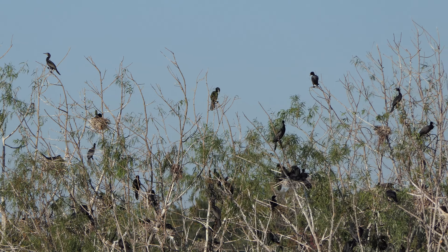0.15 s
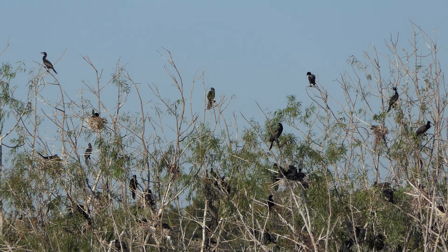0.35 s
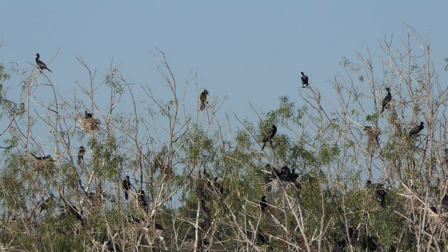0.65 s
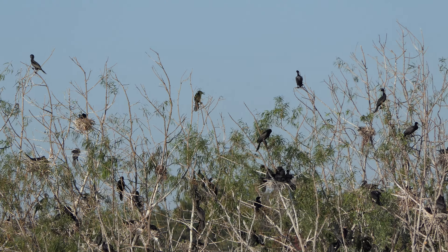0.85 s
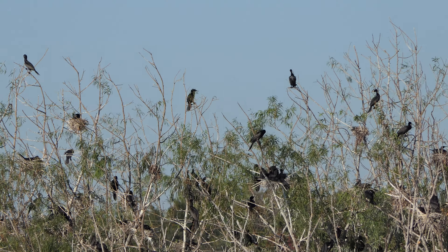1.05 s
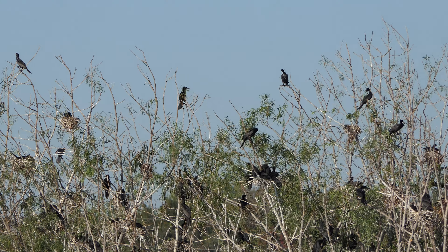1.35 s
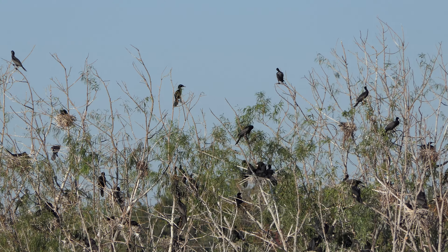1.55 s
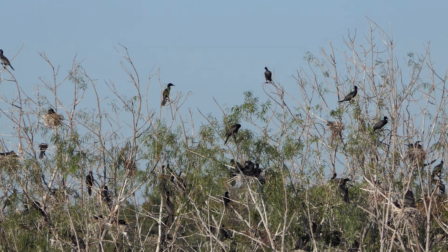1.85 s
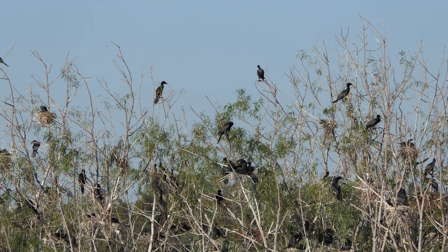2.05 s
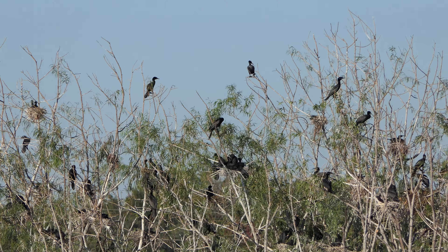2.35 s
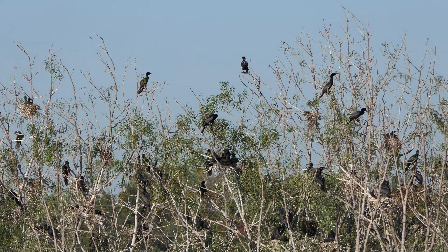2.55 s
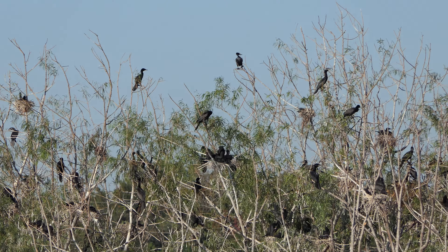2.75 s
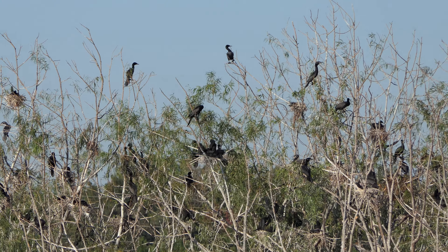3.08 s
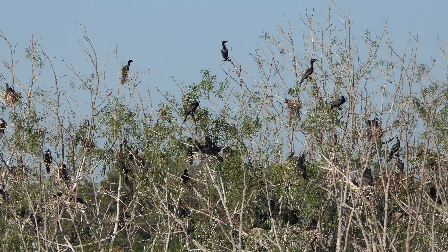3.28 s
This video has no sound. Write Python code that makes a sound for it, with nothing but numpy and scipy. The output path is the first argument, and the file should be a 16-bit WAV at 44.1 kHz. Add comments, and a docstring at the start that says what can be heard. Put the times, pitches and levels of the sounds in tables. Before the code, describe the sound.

Countless overlapping waterbird grunts blur into a steady hollow din with short gliding chick peeps, over faint high insect buzz, low distant rumble and soft wind bumps on a distant outdoor microphone; a brief squawk comes late.

```python
"""At a waterbird nesting colony, heard from afar: countless grunts blur into a hollow din.
The grunts are pulse trains and noise shaped by throat colours; chicks peep in gliding tones.
Insects buzz on the left in bursts of unsteady tone, over a far chorus of noise, and two crickets chirp.
Puffs of wind bump the microphone over noise rumble; there are decaying bill ticks, and one bird squawks
with rough pulses and breath."""
import sys
import numpy as np
from scipy import signal
from scipy.fft import rfft, irfft
from scipy.io import wavfile
from scipy.ndimage import uniform_filter1d

SR = 44100
rng = np.random.default_rng(int(sys.argv[2]) if len(sys.argv) > 2 else 0)


def dump(signal):
    """Clip the signal to [-1, 1] and save it as 16-bit WAV at the path in sys.argv[1]."""
    limited = np.clip(np.atleast_2d(signal).T, -1, 1)
    pcm = np.round(limited * 32767).astype(np.int16)
    wavfile.write(sys.argv[1], SR, pcm)


N = 150822  # length of the scene in samples

# Colour of the colony's din: (frequency [Hz], relative level [dB per Hz])
DIN_COLOUR = [(180, -44), (300, -19), (400, -21.5), (488, -17), (773, -1), (850, 0.5), (950, -5.5),
              (1100, -15.5), (1360, -4), (1440, -2.5), (1690, -10.5), (2130, -1.5), (2340, -6.5),
              (2470, -12.5), (2680, -10), (2910, -18), (3330, -12.5), (3810, -19), (4140, -15.5),
              (4730, -29), (5420, -26), (5720, -32), (6290, -30.5), (6730, -39), (7600, -38), (9880, -49),
              (16700, -120)]
DIN_DB = -39.5  # before the excitement and patches
# Excitement of the colony: (time [s], level [dB], extra shrill level [dB], extra treble level [dB])
EXCITEMENT = [(0, 2, 0, -1), (.3, 0, -0.5, -1), (.6, 0, 0, 1), (.9, 0, 1.5, 0.5), (1.17, -0.5, -1.5, 0),
              (1.4, 0.5, -0.5, -0.5), (1.7, -0.5, 1.5, 0.5), (1.95, 0, 3.5, -0.5), (2.2, -1, -2.5, 1),
              (2.4, -0.5, 6, 1), (2.6, -0.5, 2.5, 1.5), (2.8, -0.5, 0, 1), (3.0, 1.5, -2.5, 3),
              (3.2, 0, -1, 0), (3.42, -0.5, -3.5, -1)]
SHRILL_HZ, SHRILL_WIDTH_HZ, TREBLE_HZ = 2180, 280, 2900
# Groups of birds, larger to smaller: (frequency scale of the throat [ratio])
THROAT_SCALES = [.94, 1.0, 1.06]
# Edges of the throat bands, each filled with its own grunts: (frequency before throat scaling [Hz])
THROAT_EDGES = [180, 1100, 1700, 2900, 4700]
GRUNT_LOW_HZ, GRUNT_HIGH_HZ = 35.015, 130  # range of starting pulse rates
GRUNT_MEAN_S, GRUNT_SPREAD_DB = .12, 2
GRUNT_SHARE = .66  # amplitude share of separate grunts in the din
BLUR_T60_S, BLUR_DB = .15, -3  # time for the scatter to fade by 60 dB, and its level

# Buzzing insects: (pitch [Hz], pitch wander [Hz], strokes [per s], first stroke [s], stroke share [0-1],
# upward glide [Hz], left level before drift [dB], right level before drift [dB], likeness [0-1],
# left lead [rad])
BUZZERS = [(8700, 170, 58.3, .004, .8, 500, -68, -73, .95, -1.3),
           (9620, 50, 62.4, -.002, .7, 350, -65, -67.5, .97, -1.0),
           (9830, 70, 70.4, -.001, .65, 400, -65, -68, .97, -.9),
           (10680, 40, 63.5, -.0016, .6, 150, -72, -76.5, .97, -.8)]
# Drifting loudness of the insects: (time [s], then one change for each of the four insects [dB])
BUZZ_DRIFT = [(0, 0, -4, 1, 1), (.5, 0, -4, 0, 0), (1.0, 0, -1.5, -2.5, -3), (1.5, 0, 0, 1, 0),
              (2.0, 0, 0, -10, -1), (2.35, 0, 1, -5, -11), (2.6, 0, -0.5, 0, 3), (3.0, 0, 3.5, -18, 2),
              (3.42, 0, 2, -6, 5)]
HIGH_BUZZER_RISE_HZ = 229  # the fourth insect's climb over the scene
BUZZ_REST = .05  # amplitude that rings on between strokes
WEAK_STROKE_DB = -4.5  # every second stroke of the third insect
# Countless far insects: (frequency [Hz], relative level [dB per Hz])
CHORUS_COLOUR = [(6900, -24), (7600, -11), (8850, -1.5), (9300, -2.5), (10100, -12), (11200, -30)]
CHORUS_LEFT_DB, CHORUS_RIGHT_DB = -62, -64.5
CHORUS_SAME, CHORUS_LEAD_RAD = .93, -1.2  # likeness of the two sides, and left lead
# Crickets: (pitch [Hz], pitch wander [Hz], chirps [per s], level before chirp shape [dB],
# level change [dB per s])
CRICKETS = [(5390, 12, 9.3, -66, -11), (5280, 25.3, 11.5, -68.5, -5.5)]

# Distant rumble: (frequency [Hz], relative level [dB per Hz])
RUMBLE_COLOUR = [(12, -75), (20, -42.5), (49, -13), (63, -17), (84, -10.5), (161, -2), (193, 1),
                 (312, -5.5), (400, -18.5), (450, -9.5), (580, -37), (990, -120)]
RUMBLE_DB = -52  # before growth and the bass cut
RUMBLE_GROWTH_DB_PER_S = 2  # only around 118 Hz
# Wind bumps: (middle [s], length [s], pitch [Hz], level before bass cut [dB])
BUMPS = [(0.114, .045, 222, -45.5), (.205, .04, 165, -45), (1.009, .03, 220, -46.5),
         (1.516, .035, 130, -45.5), (1.604, .022, 150, -51), (1.63, .03, 155, -44.5),
         (1.687, .03, 214, -46.5), (1.742, .025, 250, -53), (2.056, .035, 135, -45),
         (2.064, .025, 270, -50), (2.143, .022, 135, -51), (3.09, .12, 192, -47.5), (3.185, .1, 180, -46)]
BUMP_WIDTH_HZ, BUMP_NOISE = 150, .45

# Clearest peeps: (start [s], length [s], first pitch [Hz], middle pitch [Hz], last pitch [Hz], level [dB])
PEEPS = [(.175, .09, 2480, 2320, 2137, -43.5), (.284, 0.034, 2660, 2660, 2630, -47),
         (.306, 0.036, 3240, 3370, 3600, -48.5), (.332, 0.036, 2010, 2000, 1880, -41.5),
         (.33, .095, 3980, 4060, 4500, -53), (.425, .09, 4550, 4200, 4330, -49),
         (0.517, 0.043, 1950, 1870, 1800, -37.5), (.635, .05, 3400, 3420, 3440, -54),
         (1.495, .04, 3900, 3865, 3830, -55), (0.887, .049, 2650, 2640, 2540, -50),
         (0.987, 0.099, 2830, 2730, 2650, -46.5), (.983, 0.065, 4230, 4130, 4280, -49),
         (1.035, 0.094, 2250, 2120, 2150, -43), (1.12, 0.039, 2246, 2180, 2080, -45),
         (1.205, 0.04, 2250, 2260, 2200, -45), (1.266, .028, 3880, 3980, 4030, -50),
         (1.285, 0.059, 1397, 1400, 1400, -43.5), (1.3, 0.047, 2090, 2104, 2150, -41.5),
         (1.335, .03, 2710, 2630, 2620, -48), (1.353, .025, 2320, 2310, 2300, -43.5),
         (1.467, 0.037, 3480, 3400, 3280, -53.5), (1.555, 0.067, 3880, 4010, 3970, -51),
         (1.678, 0.066, 1415, 1418, 1380, -44.5), (1.721, 0.073, 2336, 2305, 2140, -44),
         (1.86, 0.048, 2153, 2114, 2103, -31.5), (1.944, .064, 2335, 2315, 2320, -44),
         (2.086, 0.053, 1408, 1402, 1440, -45.5), (2.112, 0.058, 2255, 2180, 2140, -42),
         (2.182, 0.044, 1345, 1330, 1325, -45.5), (2.3, 0.086, 2134, 2117, 2050, -42.5),
         (2.375, 0.048, 2334, 2280, 2260, -43), (2.417, 0.07, 2146, 2120, 2050, -42),
         (2.66, 0.031, 4390, 4425, 4530, -54), (2.84, .03, 2220, 2230, 2194, -45),
         (2.913, 0.074, 3200, 3110, 3120, -46), (2.93, .05, 3780, 3880, 4020, -47.5),
         (2.96, 0.04, 4340, 4430, 4440, -45.5), (3.007, .035, 4250, 4380, 4450, -52),
         (3.062, 0.47, 544, 555, 562, -60)]
PEEP_ROUGH, PEEP_WOBBLE = .3, .006  # wander of loudness and pitch, as shares
# Pitches that the far chicks favour: (pitch [Hz], pitch spread [Hz], relative level [dB])
CHICKS = [(1400, 70, -3), (2120, 150, .5), (2673, 100, -8), (3240, 200, -10), (4100, 200, -16)]
FAR_PEEPS_DB, FAR_SPREAD_DB = -51, 1.5  # base level and random spread
FAR_PEEP_MEAN_S, FAR_BEND = .0401, .0344  # bend is a share of the pitch
# Bill ticks: (time [s], level before fade-in and decay [dB])
TICKS = [(.158, -50), (.19, -45), (.213, -38.5), (.236, -40.5), (.259, -41), (.685, -48.5)]
TICK_HZ, TICK_T60_S = 4870, .0112
# Colour of the squawk: (frequency [Hz], relative level [dB per Hz])
SQUAWK_COLOUR = [(180, -42), (300, -11), (557, -27), (697, -15), (785, -20), (1350, -2), (1730, -12),
                 (2030, 1), (2600, -3), (3300, -4), (4400, -5), (4900, -24), (7000, -47), (15400, -120)]
SQUAWK_AT_S, SQUAWK_S, SQUAWK_FADE_IN_S = 2.945, .1, .02
SQUAWK_DB, SQUAWK_START_HZ = -41, 330  # level before the fades, and pitch before jitter
SQUAWK_BREATH = .65  # share of breath noise

# Microphone hiss: (frequency [Hz], relative level [dB per Hz])
HISS_COLOUR = [(5000, -7), (11500, 0), (17000, -5)]
HISS_DB, HISS_SAME = -71.5, .47  # level, and likeness of the two sides
PORT_HZ = 7700  # below this both microphone ports hear the same
TOP_EDGE_HZ = 15720


def amp(db):
    """Turns dB into a gain."""
    return 10 ** (np.asarray(db) / 20)


def evened(x):
    """Scales a sound to an average strength (rms) of 1."""
    return x / np.sqrt(np.mean(abs(x) ** 2) + 1e-20)


def read(points, hz):
    """Reads a colour table between its points, along a log frequency axis."""
    table_hz, value = np.transpose(points)
    return np.interp(np.log(hz + 1), np.log(table_hz + 1), value)


def add(mix, start_s, sound):
    """Mixes a sound in at a given time."""
    part = mix[max(round(start_s * SR), 0):][:len(sound)]
    part += sound[:len(part)]


def wander(count, size):
    """Makes a smooth random curve of rms 1; a larger size in samples makes it slower."""
    return evened(signal.oaconvolve(rng.standard_normal(count), np.hanning(size), "same"))


def resonate(x, hz, width):
    """Rings at hz: shifts that pitch to zero, smooths, and shifts it back."""
    turn = np.exp(2j * np.pi * np.cumsum(hz * np.ones(x.shape[-1])) / SR)
    ring = np.exp(-np.pi * width / SR)
    return 2 * (turn * signal.lfilter([1 - ring], [1, -ring], x / turn)).real


def coloured(x, points, stretch=0.99):
    """Filters a sound by a colour table whose frequencies are multiplied by stretch; outside is silent."""
    hz = np.fft.rfftfreq(x.shape[-1], 1 / SR) / stretch
    inside = (hz > points[0][0]) & (hz < points[-1][0])
    return irfft(rfft(x) * amp(read(points, hz)) * inside, x.shape[-1])


def partly_alike(a, b, same):
    """Blends two sounds so that the result resembles a by the share same."""
    return same * a + np.sqrt(1 - same ** 2) * b


def blur(x):
    """Adds scatter from trees and water as a dying tail of noise."""
    t = np.arange(SR // 2) / SR
    tail = rng.standard_normal(len(t)) * amp(-60 * t / BLUR_T60_S)
    return x + amp(BLUR_DB) * signal.oaconvolve(x, tail / np.linalg.norm(tail))[:N]


def grunts(count):
    """Croaks as trains of uneven pulses, before the throats colour them."""
    out = np.zeros(N)
    for when, pitch, long, loud in zip(*rng.random((count, 3)).T, rng.standard_normal(count)):
        t = np.arange(0, GRUNT_MEAN_S * (.5 + long), 1 / SR)
        start_hz = GRUNT_LOW_HZ * (GRUNT_HIGH_HZ / GRUNT_LOW_HZ) ** pitch
        hz = start_hz * (1 + .08 * np.sin(np.pi * t / t[-1]))  # up and back down
        pulses = np.diff(np.floor(np.cumsum(hz) / SR), prepend=0)
        pulses = pulses * (1 + 0.12 * rng.standard_normal(len(t)))
        add(out, when * N / SR, pulses * np.hanning(len(t)) ** .5 * amp(GRUNT_SPREAD_DB * loud))
    return out


def voices(scale):
    """One group of birds: separate grunts in each throat band, moved by throat size."""
    hz = np.fft.rfftfreq(N, 1 / SR) / scale
    spectrum = 0
    for low, high in zip(THROAT_EDGES, THROAT_EDGES[1:]):
        spectrum = spectrum + rfft(grunts(count=42)) * (hz >= low) * (hz < high)
    return coloured(irfft(spectrum, N), DIN_COLOUR, scale)


def din():
    """Grunting groups over a noise smear of farther birds; excitement changes level and colour."""
    near = sum(voices(scale) for scale in THROAT_SCALES)
    far = coloured(rng.standard_normal(N), DIN_COLOUR)
    colony = partly_alike(evened(blur(near)), evened(far), GRUNT_SHARE)
    hz, t, spectrum = signal.stft(colony, SR, nperseg=512, noverlap=384)
    hz = hz[:, None]
    times, *curves = np.transpose(EXCITEMENT)
    level, shrill, treble = (np.interp(t, times, curve) for curve in curves)
    shrill_band = np.exp(-((hz - SHRILL_HZ) / SHRILL_WIDTH_HZ) ** 2)
    treble_band = 1 / (1 + (TREBLE_HZ / (hz + 1)) ** 8)
    # random patches of louder and softer sound over time and pitch
    patches = uniform_filter1d(rng.standard_normal(spectrum.shape), 5, 0)
    patches = evened(uniform_filter1d(patches, 16, 1))
    db = level + shrill_band * shrill + treble_band * treble + 0.86 * patches
    return amp(DIN_DB) * signal.istft(spectrum * amp(db), SR, nperseg=512, noverlap=384)[1][:N]


def unsteady_tone(hz, width):
    """A turning wave whose pitch and loudness wander."""
    turns = np.cumsum(hz + width * wander(N, size=250)) / SR
    return np.exp(2j * np.pi * turns) * (1 + 0.13 * wander(N, size=600))


def buzzing_insects():
    """Each wing stroke is a burst of unsteady tone that glides up."""
    t, out = np.arange(N) / SR, np.zeros((2, N))
    times, *drift = np.transpose(BUZZ_DRIFT)
    for k, (hz, width, rate, first, duty, glide, left_db, right_db, same, lead) in enumerate(BUZZERS):
        strokes = (t - first) * rate
        u = np.minimum(strokes % 1 / duty, 1)  # progress through a stroke
        hz = hz + glide * (u - .5)
        if k == 3:
            hz = hz + HIGH_BUZZER_RISE_HZ * (t / t[-1] - .5)
        a, b = unsteady_tone(hz, width), unsteady_tone(hz, width)
        pair = np.array([a * np.exp(1j * lead), partly_alike(a, b, same)]).real
        weak = amp((k == 2) * WEAK_STROKE_DB * (np.floor(strokes) % 2))
        beats = BUZZ_REST + weak * np.sin(np.pi * u) ** 2
        level_db = np.array([[left_db], [right_db]]) + np.interp(t, times, drift[k])
        out += evened(pair * beats) * amp(level_db)
    return out


def insect_chorus():
    """Countless far insects merge into coloured noise, with the left side shifted in phase."""
    a, b = evened(coloured(rng.standard_normal((2, N)), CHORUS_COLOUR))
    left = irfft(rfft(a) * np.exp(1j * CHORUS_LEAD_RAD), N)
    right = partly_alike(a, b, CHORUS_SAME)
    return np.array([amp(CHORUS_LEFT_DB) * left, amp(CHORUS_RIGHT_DB) * right])


def crickets():
    """Wandering tones swell and fall with each chirp while their level fades."""
    t, out = np.arange(N) / SR, np.zeros(N)
    for hz, width, rate, db, fade in CRICKETS:
        chirp = np.maximum(np.sin(2 * np.pi * rate * t) + 0.95, 0)
        turns = np.cumsum(hz + width * wander(N, size=800)) / SR
        out += amp(db + fade * t) * chirp * np.sin(2 * np.pi * turns)
    return out


def bass_cut(x):
    """Weakens the bass below 65 Hz."""
    return signal.sosfilt(signal.butter(4, 65, "high", fs=SR, output="sos"), x)


def rumble():
    """Lumpy distant noise whose bass around 118 Hz grows."""
    noise = evened(coloured(rng.standard_normal(N), RUMBLE_COLOUR))
    deep = resonate(resonate(noise, 118, 68), 118, 68)
    growth = amp(RUMBLE_GROWTH_DB_PER_S * np.arange(N) / SR) - 1
    lumps = amp(RUMBLE_DB + 1.0 * wander(N, size=4000))
    return bass_cut(lumps * (noise + deep * growth))


def peep(length, first_hz, middle_hz, last_hz, level_db):
    """A short husky whistle that glides through three pitches."""
    u = np.linspace(0, 1, int(length * SR))
    wobble, husk = wander(len(u), size=200), wander(len(u), size=200)
    hz = uniform_filter1d(np.interp(u, [0, .4, 1], [first_hz, middle_hz, last_hz]), 200)
    turns = np.cumsum(hz * (1 + PEEP_WOBBLE * wobble)) / SR
    fades = np.minimum(np.minimum(u / 0.2, (1 - u) / 0.36), 1)
    shape = np.sin(np.pi / 2 * fades) ** 2
    return amp(level_db) * np.sqrt(2) * shape * (1 + PEEP_ROUGH * husk) * np.sin(2 * np.pi * turns)


def chicks(count):
    """Clear peeps with faint scatter, and a blurred crowd of fainter peeps at random times."""
    clear, crowd = np.zeros((2, N))
    for start, *row in PEEPS:
        add(clear, start, peep(*row))
    draws = zip(*rng.random((count, 2)).T, rng.standard_normal((count, 4)))
    for k, (when, long, (off, before, after, loud)) in enumerate(draws):
        hz, spread, db = CHICKS[k % len(CHICKS)]
        hz = hz + spread * off
        first_hz, last_hz = hz * (1 + FAR_BEND * before), hz * (1 + FAR_BEND * (after - .5))
        level_db = FAR_PEEPS_DB + db + FAR_SPREAD_DB * np.clip(loud, -2, 1.5)
        add(crowd, when * N / SR, peep(FAR_PEEP_MEAN_S * (.5 + long), first_hz, hz, last_hz, level_db))
    return clear + blur(crowd) + amp(-17.0) * (blur(clear) - clear)


def wind_bumps():
    """Short puffs of wind on the microphone: a low tone and ringing noise swell and fade."""
    out = np.zeros(N)
    for middle, length, hz, db in BUMPS:
        t = np.arange(int(length * SR)) / SR
        puff = resonate(rng.standard_normal(len(t)), hz, BUMP_WIDTH_HZ)
        puff = evened(resonate(puff, hz, BUMP_WIDTH_HZ))
        tone = np.cos(2 * np.pi * hz * (t - length / 2))
        bump = (tone + BUMP_NOISE * puff) * np.hanning(len(t)) ** 1.37
        add(out, middle - length / 2, amp(db) * evened(bump))
    return bass_cut(out)


def bill_ticks():
    """Dry bill ticks: a high tone that starts fast and dies fast."""
    out, t = np.zeros(N), np.arange(800) / SR
    for start, db in TICKS:
        fade_in = np.minimum(t / 0.00057, 1)
        add(out, start, amp(db - 60 * t / TICK_T60_S) * fade_in * np.sin(2 * np.pi * TICK_HZ * t))
    return out


def squawk():
    """One harsh call: jittered, rising pulses and breath noise through a throat colour."""
    out, t = np.zeros(N), np.arange(0, SQUAWK_S, 1 / SR)
    hz = SQUAWK_START_HZ * (1 + 0.086 * t / SQUAWK_S + 0.035 * wander(len(t), size=300))
    pulses = evened(np.diff(np.floor(np.cumsum(hz) / SR), prepend=0))
    drive = (1 - SQUAWK_BREATH) * pulses + SQUAWK_BREATH * rng.standard_normal(len(t))
    shape = np.minimum(t / SQUAWK_FADE_IN_S, 1) * np.minimum((SQUAWK_S - t) / 0.04, 1)
    add(out, SQUAWK_AT_S, amp(SQUAWK_DB) * shape * evened(coloured(drive, SQUAWK_COLOUR)))
    return out


def scene():
    """Birds, crickets, rumble and wind are central; the buzzers and chorus are spread."""
    central = din() + crickets() + rumble() + chicks(count=350) + wind_bumps() + bill_ticks() + squawk()
    return central + buzzing_insects() + insect_chorus()


def record(dry):
    """Adds microphone hiss, keeps the ports different only in the treble, and limits the top."""
    a, b = rng.standard_normal((2, N))
    hiss = evened(coloured(np.array([a, partly_alike(a, b, HISS_SAME)]), HISS_COLOUR))
    x = dry + amp(HISS_DB) * hiss
    treble_only = signal.firwin(511, PORT_HZ, pass_zero=False, window=("kaiser", 8), fs=SR)
    side = signal.oaconvolve((x[0] - x[1]) / 2, treble_only, "same")
    x = x.mean(0) + np.array([side, -side])
    top_limit = signal.firwin(1023, TOP_EDGE_HZ, window=("kaiser", 9), fs=SR)
    return signal.oaconvolve(x, top_limit[None], "same")


dry = scene()
out = record(dry)
dump(out)
```